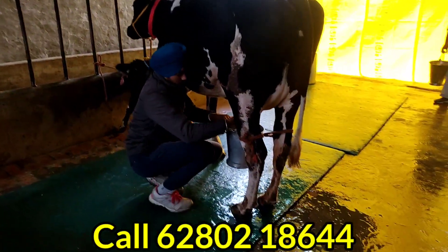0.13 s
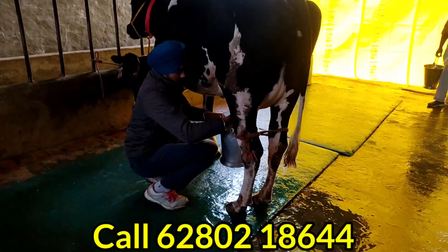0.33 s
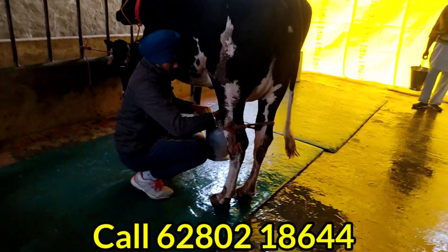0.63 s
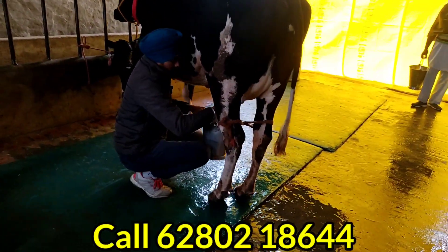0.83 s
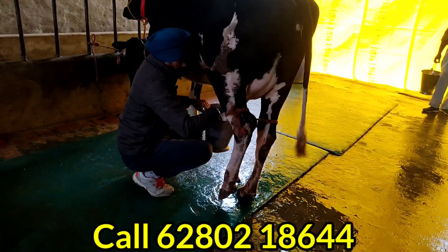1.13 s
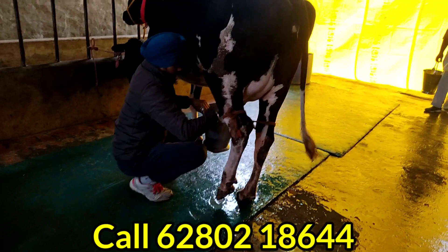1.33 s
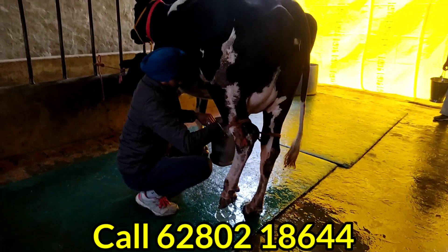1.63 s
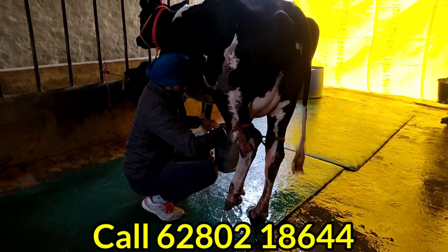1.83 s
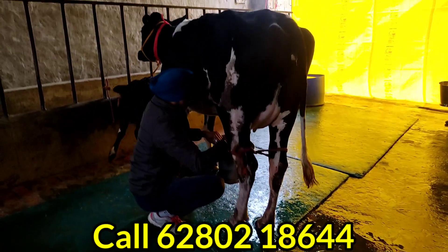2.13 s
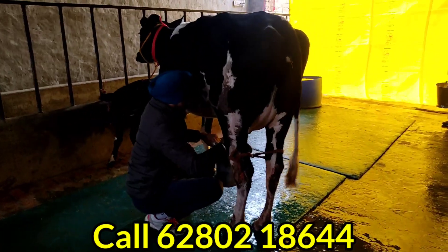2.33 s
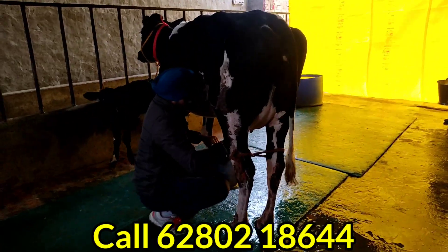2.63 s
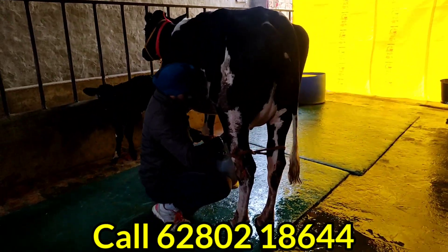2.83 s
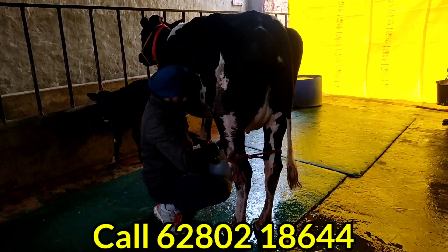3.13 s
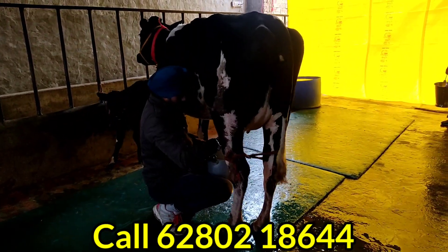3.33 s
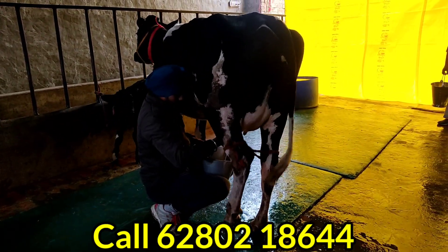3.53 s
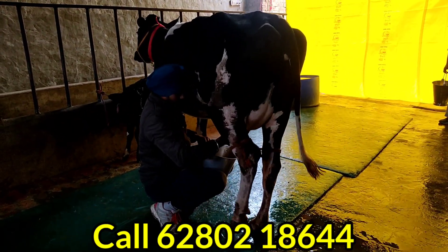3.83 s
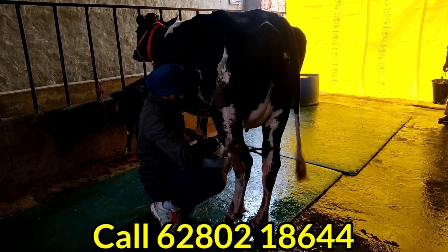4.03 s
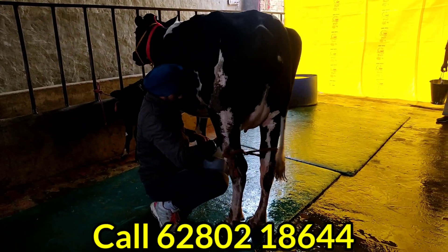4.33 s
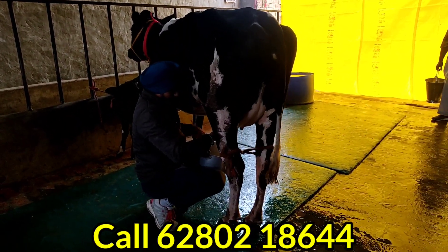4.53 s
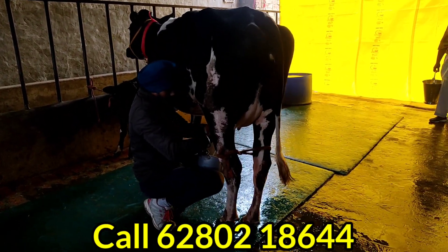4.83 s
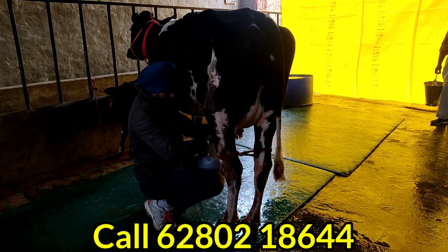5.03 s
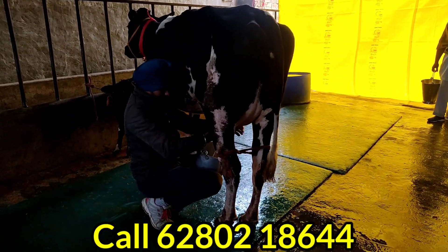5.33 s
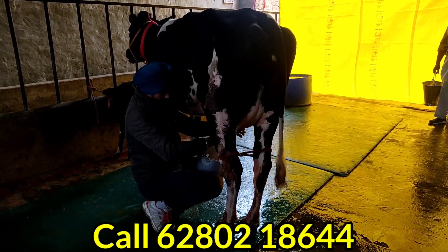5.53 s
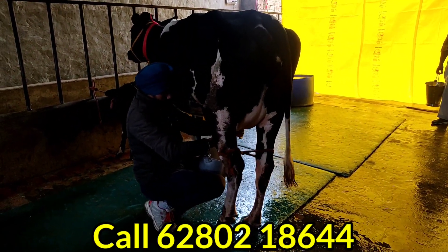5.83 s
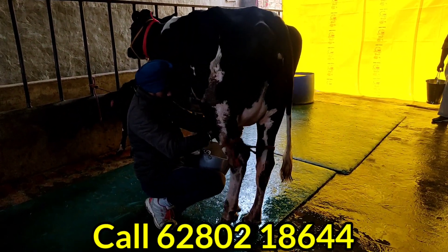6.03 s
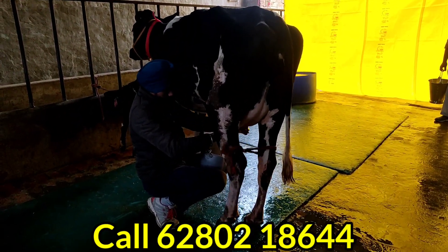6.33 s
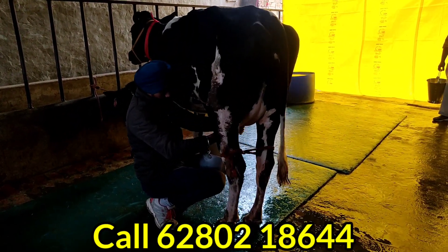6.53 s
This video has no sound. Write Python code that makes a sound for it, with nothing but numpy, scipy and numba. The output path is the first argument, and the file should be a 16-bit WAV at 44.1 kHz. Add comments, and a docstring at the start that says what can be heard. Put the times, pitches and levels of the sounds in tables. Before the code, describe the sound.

Close on a metal bucket in a farm shed, jets of milk strike one after another. Each swells fast into a bright rasping squirt with metallic patter, a bubbly gurgle and frothy fizz, then stops abruptly, leaving a slight rim ring and short echo. Small stray spurts, dull knocks and rare ticks fall between. The first is weak, later ones sharper and a bit quicker; faint low rumble drops in the pauses.

```python
"""Hand milking into a metal bucket in a farm shed: ten squirts, most of the later ones swelling faster.
Each jet breaks into drops: noise-like impacts through resonators drum on the bucket, gurgle in a
crater in the milk and fizz in the froth. Stray spurts, knocks and ticks fall around them.
The bucket rim rings on, the shed echoes; a low rumble is turned down in the pauses over faint hiss."""
import sys
import numpy as np
from scipy import signal
from scipy.fft import rfft, irfft, next_fast_len
from scipy.io import wavfile
from numba import njit

SR = 44100
rng = np.random.default_rng(int(sys.argv[2]) if len(sys.argv) > 2 else 0)


def to_wav(sig):
    """Store sig (one row per channel, or 1-D mono) as 16-bit WAV at the path in sys.argv[1].

    Samples outside -1..1 are clipped; the rate is SR.
    """
    pcm = np.clip(np.atleast_2d(sig), -1, 1) * 32767
    pcm = np.round(pcm).astype(np.int16)
    wavfile.write(sys.argv[1], SR, pcm.T)  # frames by channels


N = 294588


def undb(db):
    """Decibels to gain."""
    return 10 ** (np.asarray(db) / 20)


def unit(x):
    """Scale to rms 1."""
    return x / np.sqrt(np.mean(x ** 2) + 1e-18)


def resonate(x, hz, width_hz):
    """One resonance, gain 1 at its centre."""
    return signal.lfilter(*signal.iirpeak(hz, hz / width_hz, fs=SR), x)


def resonate_twice(x, hz, width_hz):
    """Two equal resonances in series: steeper skirts."""
    return resonate(resonate(x, hz, width_hz), hz, width_hz)


def band(x, low_hz, high_hz):
    """Band-pass with steep skirts."""
    return signal.sosfilt(signal.butter(3, [low_hz, high_hz], "band", fs=SR, output="sos"), x)


def colour(x, points):
    """Shape the spectrum by (f/Hz, level/dB) points, joined over log frequency."""
    hz, db = np.transpose(points)
    size = next_fast_len(len(x))
    bins_hz = np.fft.rfftfreq(size, 1 / SR)
    gain = undb(np.interp(np.log(bins_hz + 1), np.log(hz), db))
    return irfft(rfft(x, size) * gain, size)[:len(x)]


def wander(t, rate):
    """Random values joined by lines, rate of them a second."""
    return np.interp((t - t[0]) * rate, np.arange(2048), rng.standard_normal(2048))


def add(out, start_s, sound):
    """Mix a sound in at a time."""
    i = max(int(start_s * SR), 0)
    out[i:i + len(sound)] += sound[:N - i]


def suppressor(x):
    """Noise suppressor gain for the rumble: open while x is loud, closing slowly after it."""
    knee_db, floor_db, lag_s = -50, -23.5, 0.071
    keep = np.exp(-1 / (lag_s * SR))
    loudness = signal.lfilter([1 - keep], [1, -keep], np.abs(x))
    return undb(floor_db) + loudness / np.hypot(loudness, undb(knee_db))


def background(gain):
    """Low rumble with a faint hum (narrow noise), let through by the given gain, over thin hiss."""
    # spectra: f/Hz, relative level/dB
    rumble_points = [(20, -9), (42, -4.5), (58, -20.5), (86, -2.5), (130, -11.5), (340, -10), (560, -22),
                     (850, -21.5), (1500, -32), (3000, -74.5)]
    hiss_points = [(100, -13.5), (800, -5), (2000, -15.5), (5000, -17), (10000, -19.5), (16000, -17.5)]
    # rumble and hum level before the gain: t/s, level/dB
    level_points = [(0, -61.5), (1.6, -65), (2.3, -60), (3.0, -61), (5.3, -59), (6.68, -55.5)]
    t = np.arange(N) / SR
    rumble = unit(colour(rng.standard_normal(N), rumble_points))
    hum = undb(-5.5) * unit(resonate_twice(rng.standard_normal(N), 86, 18))
    hiss = undb(-79.5) * unit(colour(rng.standard_normal(N), hiss_points))
    swell = gain * undb(np.interp(t, *np.transpose(level_points)))
    return swell * (undb(1.8) * rumble + hum) + hiss


def ticks():
    """Very short treble noise bursts, probably flying droplets."""
    # ticks: t/s, level/dB, f/Hz
    tick_rows = [(0.179, -64.5, 5000), (3.04, -51.5, 14000), (3.099, -40, 14000), (3.137, -29, 12500)]
    width_hz, fade_s = 3500, .007
    out, t = np.zeros(N), np.arange(4096) / SR
    for start_s, db, hz in tick_rows:
        burst = unit(resonate_twice(rng.standard_normal(len(t)), hz, width_hz))
        add(out, start_s, undb(db) * burst * np.exp(-t / fade_s))
    return out


def shed(x):
    """Floor and wall reflections as decaying noise; the treble dies first."""
    # low edge/Hz, high edge/Hz, decay t60/s, level/dB
    echo_bands = [(158.1, 1350, 0.51, -7), (1400, 7200, 0.48, -19.5),
                  (4560, 9000, 0.11, -7.5), (9000, 19000, 0.12, -23.5)]
    t, echo = np.arange(SR) / SR, 0
    for low_hz, high_hz, t60_s, db in echo_bands:
        tail = rng.standard_normal(SR) * undb(-60 * t / t60_s) * (t > .008)
        echo = echo + undb(db) * band(tail / np.linalg.norm(tail), low_hz, high_hz)
    return signal.fftconvolve(x, echo)[:N]


def drops(flow, rate, scatter_db):
    """Impacts at random moments and of uneven size, as strong as the flow; rate per second."""
    n = len(flow)
    lands = rng.random(n) < rate / SR
    sign = np.sign(rng.standard_normal(n))
    return flow * lands * sign * undb(scatter_db * rng.standard_normal(n))


def jet(t):
    """The jet breaks into clumps: each lands as a brief splash on top of the steady stream."""
    clumps = np.abs(drops(np.ones(len(t)), rate=160, scatter_db=0.5))
    splashes = signal.lfilter([1], [1, -np.exp(-1 / (0.0012 * SR))], clumps)
    return 1 + .85 * splashes


def inside(x):
    """Reflections between milk and wall; their paths change as the surface churns."""
    t, lag = np.arange(len(x)) / SR, np.arange(768) / SR
    paths = rng.standard_normal((5, len(lag))) * np.exp(-lag / 0.0038)
    paths = paths / np.linalg.norm(paths, axis=1)[:, None]
    shares = np.array([wander(t, rate=22) for _ in paths])
    shares = shares / np.linalg.norm(shares, axis=0)
    echoes = signal.fftconvolve(x[None], paths, axes=1)[:, :len(x)]
    return x + undb(15) * np.sum(echoes * shares, axis=0)


def fizz(flow):
    """Tiny bursts in the froth."""
    # froth spectrum: f/Hz, relative level/dB
    froth_points = [(1500, -37), (2800, -0.5), (4700, 1), (5300, -1), (6000, 0), (6700, -4), (7700, -2.5),
                    (8800, -7), (10500, -4), (13000, -5), (15500, -10.5)]
    return unit(colour(inside(drops(flow, rate=7000, scatter_db=6.5)), froth_points))


def ring(flow, modes, rate):
    """Drops land all over the metal, so each mode gets its own share of blows."""
    total = 0
    for hz, width_hz, db in modes:
        blows = drops(flow, rate, scatter_db=1.5)
        total = total + undb(db) * unit(resonate(blows, hz, width_hz))
    return total


@njit
def sweep(x, hz, width_hz):
    """A resonance whose centre and width move (state-variable filter)."""
    y, b, l = np.empty(len(x)), 0., 0.
    for i in range(len(x)):
        g, k = np.tan(np.pi * hz[i] / SR), width_hz[i] / hz[i]
        v = (b + g * (x[i] - l)) / (1 + g * (g + k))
        b, l, y[i] = 2 * v - b, l + 2 * g * v, k * v
    return y


def gurgle(flow, hz, width_hz, rate):
    """Drops ring a steep resonance that wobbles with the churning milk; power is independent of width."""
    t = np.arange(len(flow)) / SR
    hz = hz * (1 + 0.038 * wander(t, rate=38))
    width_hz = width_hz * np.ones(len(t))
    blows = drops(flow, rate, scatter_db=2) / np.sqrt(width_hz)
    return unit(sweep(sweep(blows, hz, width_hz), hz, width_hz))


def patter(flow, middle_hz, high_hz, wall_db=0):
    """Drops ring the whole wall; the spot that they hit favours two regions."""
    # bucket wall: f/Hz, width/Hz, relative level/dB
    wall_modes = [(2567, 78, 2.5), (3180, 31, 4.2), (3426, 100, 2.6), (4030, 590, 3.6), (4270, 230, 6.1)]
    wall = undb(wall_db) * unit(band(inside(ring(flow, wall_modes, rate=2100)), 1500, 4900))
    middle = gurgle(flow, middle_hz, 350, rate=2000)
    high = gurgle(flow, high_hz, 220, rate=1200)
    return unit(wall + undb(1) * middle + undb(3) * high)


def crater(flow, hz, width_hz):
    """Air pulled under rings as a bubble cloud: most near one pitch, some scattered around it."""
    stir = np.sqrt(flow)  # the milk evens out the splashes
    main = gurgle(stir, hz, width_hz, rate=1300)
    scattered = gurgle(stir, hz, 570, rate=900)
    return unit(main + undb(-11.0) * scattered)


def spurts():
    """Short jets and dribbles between the full squirts, and surges within them."""
    # t/s, fade time constant/s, fizz level/dB, patter level/dB, bubble level/dB, bubble f/Hz
    spurt_rows = [(0.335, 0.018, -40.5, -36.5, -46, 2070), (.644, 0.041, -70, -30, -59, 2420),
                  (.773, 0.023, -37, -21.5, -49, 2300), (.917, 0.025, -37.5, -36, -37, 2360),
                  (1.038, 0.012, -49, -41.5, -35, 2400), (1.063, 0.0066, -49, -61.5, -28.5, 2334),
                  (1.115, 0.067, -59.5, -55, -69, 2330), (1.416, 0.069, -24.5, -25, -27.5, 2034),
                  (1.914, 0.052, -36.5, -38, -52, 1830), (1.948, 0.054, -27, -39.5, -50, 1925),
                  (2.207, 0.015, -51, -21.5, -47, 1833), (2.71, 0.011, -11.5, -21.5, -54.5, 2050),
                  (3.171, 0.05, -47, -19, -39, 2000), (3.309, 0.038, -21, -23.5, -42.5, 2000),
                  (3.543, 0.043, -60.5, -46, -40.5, 1978), (3.902, 0.045, -42, -19.5, -19, 2142),
                  (4.308, 0.045, -63.5, -72.5, -55.5, 1946), (4.789, 0.013, -27.5, -22, -23.5, 2144),
                  (4.822, 0.018, -46, -58.5, -43.5, 1950), (5.078, 0.025, -17, -25, -45, 2090),
                  (5.348, 0.015, -67.5, -49.5, -45.5, 1960), (6.346, 0.0097, -85, -84, -66, 2060),
                  (6.5, 0.09, -55, -26.5, -36, 1990)]
    attack_s = 0.0088
    out, t = np.zeros(N), np.arange(16384) / SR
    for start_s, fade_s, fizz_db, patter_db, bubble_db, hz in spurt_rows:
        flow = jet(t)
        sound = undb(fizz_db) * fizz(flow)
        sound += undb(patter_db) * patter(flow, 2700, 3950)
        sound += undb(bubble_db) * crater(flow, hz, 96)
        add(out, start_s, sound * np.minimum(t / attack_s, 1) * np.exp(-t / fade_s))
    return out


def rim(x):
    """The thin free upper wall sings along and rings on after each jet."""
    # bucket rim: f/Hz, width/Hz, level/dB
    rim_modes = [(1439, 6.3, -1.5), (2025, 5.5, -13.5), (2360, 18, -18), (3180, 6, -5), (3610, 27, 1),
                 (4274, 7, -2)]
    return sum(undb(db) * resonate(x, hz, width_hz) for hz, width_hz, db in rim_modes)


def knocks():
    """Bucket and hooves: a damped, rattling thud with a clack on top."""
    # t/s, level/dB, thud f/Hz, thud decay t60/s, clack level re thud/dB, clack f/Hz
    knock_rows = [(0.34, -59.5, 187, 0.4, 6, 900), (1.04, -57, 454, 0.098, 7.5, 804),
                  (1.12, -60.5, 403.6, 0.6, 9, 950), (1.241, -52.5, 334, 0.34, -3.5, 850),
                  (2.258, -46.5, 205, 0.25, 9.5, 1090), (2.37, -54.5, 75, .5, -31, 849),
                  (2.765, -52, 261, .2, 12.5, 950), (3.614, -47, 443, 0.14, 5.5, 844),
                  (3.762, -41.5, 82, 0.25, -32.5, 863), (4.796, -33, 327, 0.18, -3, 1400),
                  (4.826, -33, 347, 0.059, -26, 2700), (5.2, -51, 71, 1, -43, 900)]
    attack_s, clack_t60_s = .005, 0.091
    out, t = np.zeros(N), np.arange(16384) / SR
    for start_s, db, hz, t60_s, clack_db, clack_hz in knock_rows:
        thud_noise, clack_noise = rng.standard_normal((2, len(t)))
        rattle = unit(band(thud_noise, 0.67 * hz, 1.3 * hz))
        thud = (np.sin(2 * np.pi * hz * t) + 0.53 * rattle) * undb(-60 * t / t60_s)
        clack = unit(resonate_twice(clack_noise, clack_hz, 450)) * undb(-60 * t / clack_t60_s)
        knock = undb(db) * (thud + undb(clack_db) * clack)
        add(out, start_s, knock * np.minimum(t / attack_s, 1))
    return out


def body(flow):
    """The base and the air column of the bucket answer with a hollow drumming."""
    # bucket body: f/Hz, width/Hz, relative level/dB
    body_modes = [(338, 68, 2.5), (851, 90, 7.5)]
    return unit(band(ring(flow, body_modes, rate=1600), 264, 1700))


def squeeze(t, rise_s, hold_s, swell_db, release_db_per_s):
    """Hand pressure in dB below its top: the fist closes, holds and lets go."""
    rise_curve = 1.18  # above 1: fast at first, rounded at the top
    closing = np.clip(1 - t / rise_s, 0, 1) ** rise_curve
    return -swell_db * closing - release_db_per_s * np.maximum(t - rise_s - hold_s, 0)


def squirts():
    """Each squeeze of a teat sends one jet into the bucket; hand pressure drives all its sounds."""
    # t/s, rise/s, hold/s, swell during rise/dB, release/(dB/s),
    # levels before trim: patter/dB, whole wall within patter/dB, fizz/dB, fizz drift/(dB/s),
    #   crater/dB, low ring/dB,
    # crater f/Hz, crater width/Hz, low, middle and high ring f/Hz, ring glide/(share/s)
    squirt_rows = [(0.626, .16, 0.093, 17, 208, -33, -5, -33, -18, -37, -58.5, 2317, 130, 1660, 2830, 3540, .15),
                   (1.196, 0.31, 0.013, 39, 159, -19.5, -4.5, -26.5, -6.5, -40, -45, 1980, 263, 1328, 2720, 3597, 0.03),
                   (1.875, 0.21, 0.074, 36.5, 168.5, -21.5, 4.5, -24.5, -37, -34.5, -44, 1913, 205.3, 1370, 3130, 3850, -0.23),
                   (2.574, 0.12, 0.08, 21, 268, -20.5, 8.5, -27.5, -24, -36.5, -43.5, 1930, 560, 1154, 3080, 3640, -0.4),
                   (3.121, 0.088, 0.14, 8.5, 195.5, -23, 1.5, -31, 16, -33.5, -39.5, 2070, 509, 1585, 3010, 4040, 0.43),
                   (3.712, 0.041, .23, 14, 201, -23.5, -9, -35.5, 5.5, -22.5, -37.5, 2209, 163, 1444, 3016, 4090, 0.04),
                   (4.35, 0.11, 0.094, 17, 195.5, -19, 1.5, -28.5, -57, -25.5, -38, 2083, 170, 1598, 2970, 3830, -0.53),
                   (4.914, 0.078, 0.14, 18, 252, -19, 2, -33.5, 7, -36, -47, 2070, 390, 1210, 2904, 4186, -0.06),
                   (5.502, .06, 0.1, 10.5, 249, -23.5, 3, -33, 0, -44, -55.5, 2044, 382, 1195, 2764, 4240, 0.02),
                   (6.408, 0.12, 0.055, 31, 79, -21.5, -22, -34.5, 1, -30, -36.5, 2045, 91, 1640, 3974, 3970, 0.28)]
    open_s = 0.021
    fizz_follow, crater_follow, low_follow = 1, 1.166, 3.1  # dB per dB of pressure
    crater_sag_per_s = 0.07  # the crater deepens: pitch sinks by this share
    aim_wobble, aim_wobbles_per_s = 0.022, 11  # unsteady hand moves the landing spot and the rings
    out, t = np.zeros(N), np.arange(28672) / SR
    for row in squirt_rows:
        start_s, rise_s, hold_s, swell_db, release_db_per_s = row[:5]
        patter_db, wall_db, fizz_db, fizz_drift, crater_db, low_db = row[5:11]
        crater_hz, width_hz, low_hz, middle_hz, high_hz, glide = row[11:]
        pressure_db = squeeze(t, rise_s, hold_s, swell_db, release_db_per_s)
        since_top = t - rise_s
        fizz_gain = undb(fizz_db + fizz_follow * pressure_db + fizz_drift * since_top)
        patter_gain = undb(patter_db + pressure_db)
        crater_gain = undb(crater_db + crater_follow * pressure_db)
        low_gain = undb(low_db + low_follow * pressure_db)
        pitch_hz = crater_hz * (1 - crater_sag_per_s * since_top)
        aim = 1 + glide * since_top + aim_wobble * wander(t, aim_wobbles_per_s)
        flow = jet(t)
        sound = undb(3.0) * fizz_gain * fizz(flow)
        sound += undb(-2.0) * patter_gain * patter(flow, aim * middle_hz, aim * high_hz, wall_db)
        sound += crater_gain * crater(flow, pitch_hz, width_hz)
        # the low ring glides against the others
        sound += undb(-0.5) * low_gain * gurgle(flow, low_hz / aim, 120, rate=1200)
        # drumming grows with both the spray and the low ring
        sound += (undb(-30) * fizz_gain + undb(-15) * low_gain) * body(flow)
        add(out, start_s, np.minimum(t / open_s, 1) * sound)
    return out


def plunges():
    """Where the jet breaks through the froth into open milk, the crater rings and its pitch settles."""
    # t/s, length/s, level/dB, settled f/Hz, starting offset/Hz, width/Hz
    plunge_rows = [(1.193, .05, -30, 1970, 399, 262), (1.237, .21, -24.5, 2020, -4, 270.7),
                   (1.876, 0.068, -42.5, 1917, 98, 125.7), (1.957, 0.018, -28, 1954, 5, 118.4),
                   (2.087, 0.059, -16, 1894, -1, 110.4), (3.059, 0.08, -45.5, 1907, -160, 80),
                   (3.119, 0.02, -33.5, 2006, -150, 257), (3.736, 0.011, -17.5, 1966, -1.5, 109),
                   (4.46, .033, -21.5, 1992, -1, 150), (4.491, 0.036, -13, 2018, -4.5, 141.5),
                   (4.933, 0.047, -28.5, 2240, 102, 330), (6.409, 0.022, -43, 2008, 2.5, 79.6),
                   (6.499, 0.078, -34.5, 2000, -7, 90)]
    # crater overtones: multiple of its pitch, width/Hz, level/dB
    overtone_rows = [(1.759, 262, -18.5), (3.05, 451, -29)]
    attack_s, settle_s, fade_s = .005, .025, .012
    out, t = np.zeros(N), np.arange(16384) / SR
    for start_s, length_s, db, hz, offset_hz, width_hz in plunge_rows:
        gate = np.minimum(t / attack_s, 1) * np.exp(-np.maximum(t - length_s, 0) / fade_s)
        pitch_hz = hz + offset_hz * np.exp(-t / settle_s)
        flow = jet(t)
        sound = crater(flow, pitch_hz, width_hz)
        for multiple, part_width_hz, part_db in overtone_rows:
            sound += undb(part_db) * gurgle(flow, multiple * pitch_hz, part_width_hz, rate=3500)
        sound += undb(-14) * fizz(flow) + undb(-39) * body(flow)
        add(out, start_s, undb(db) * gate * sound)
    return out


def thin_hiss():
    """A thin, airy hiss in two bands lingers after the fourth squirt and dies away."""
    # f/Hz, width/Hz, level/dB
    thin_bands = [(5740, 900, -51), (7800, 890, -54)]
    start_s, attack_s, fade_s = 2.83, .02, .2
    out, t = np.zeros(N), np.arange(16384) / SR
    hiss = 0
    for hz, width_hz, db in thin_bands:
        hiss = hiss + undb(db) * gurgle(jet(t), np.full(len(t), hz), width_hz, rate=6600)
    add(out, start_s, hiss * np.minimum(t / attack_s, 1) * np.exp(-t / fade_s))
    return out


def scene():
    """Milk, bucket, knocks and ticks sound in the shed over the background."""
    milk = squirts() + plunges() + spurts()
    near = milk + rim(milk) + knocks() + ticks() + thin_hiss()
    return (near + shed(near) + background(suppressor(near)))[None]


def record(dry):
    """The recorder rounds the highest peaks and cuts the top."""
    top_hz = 15750
    rounded = .9 * np.tanh(dry / .9)
    return signal.sosfilt(signal.ellip(10, .2, 80, top_hz, fs=SR, output="sos"), rounded)


dry = scene()
out = record(dry)
to_wav(out)
```